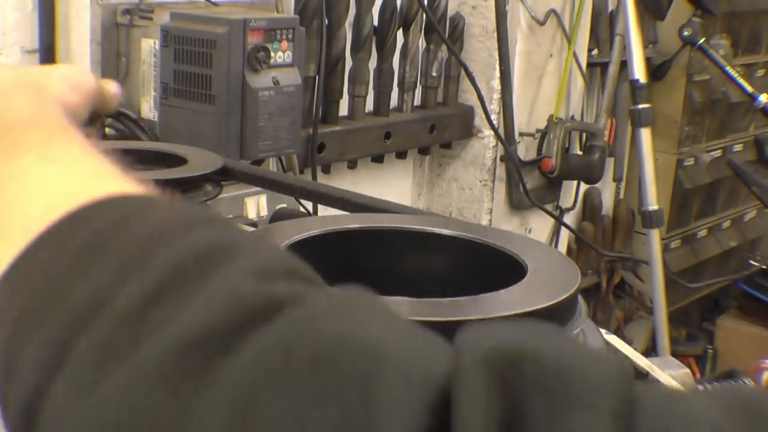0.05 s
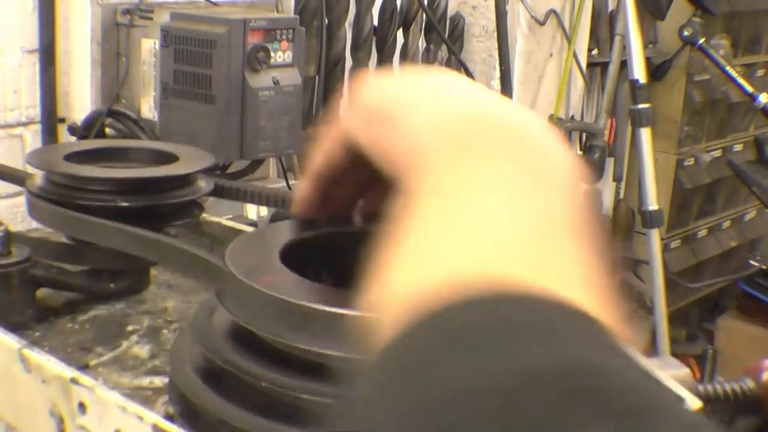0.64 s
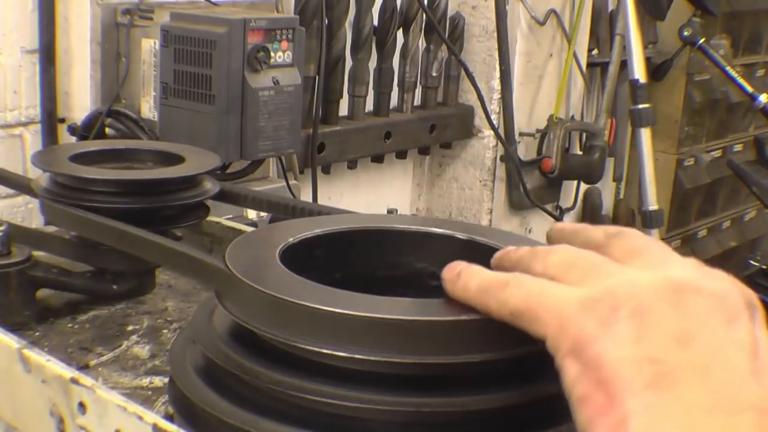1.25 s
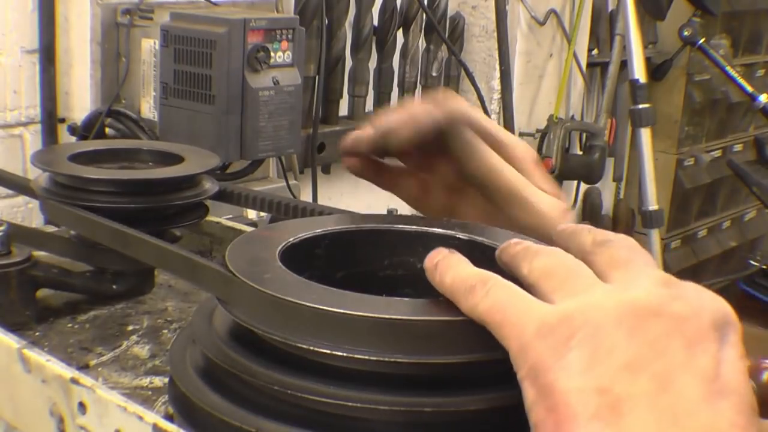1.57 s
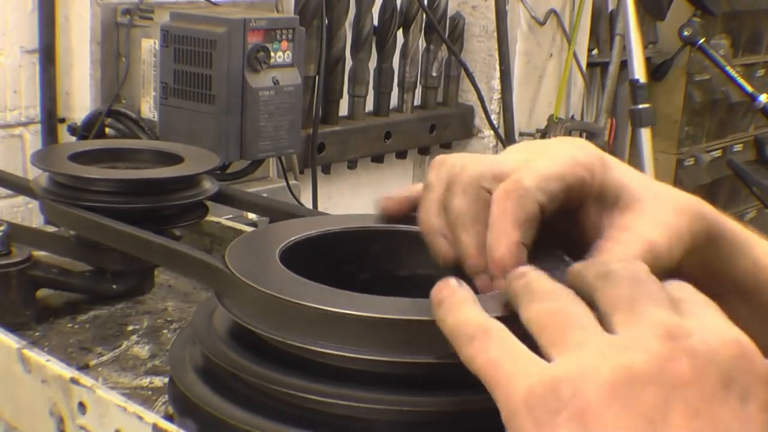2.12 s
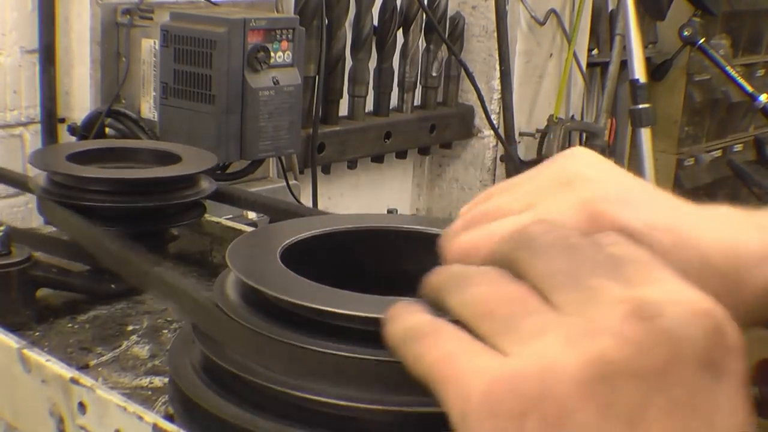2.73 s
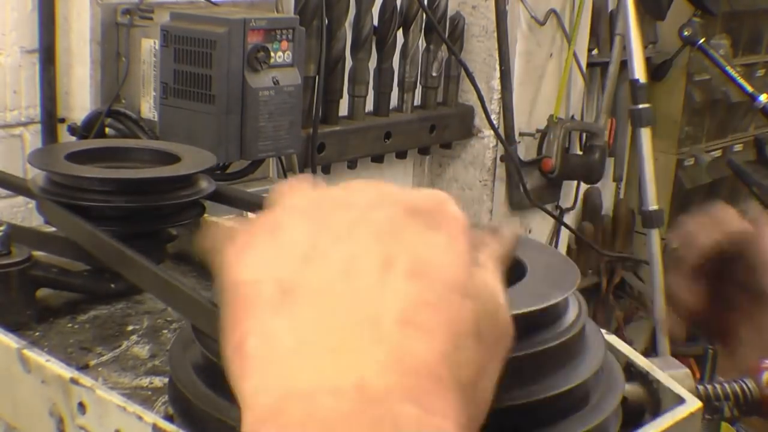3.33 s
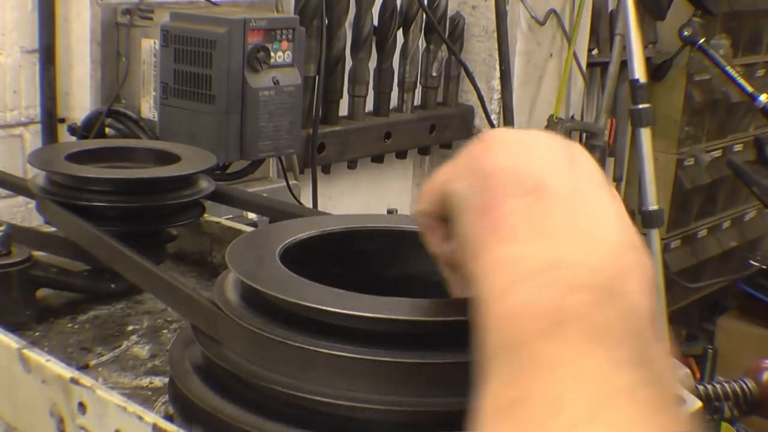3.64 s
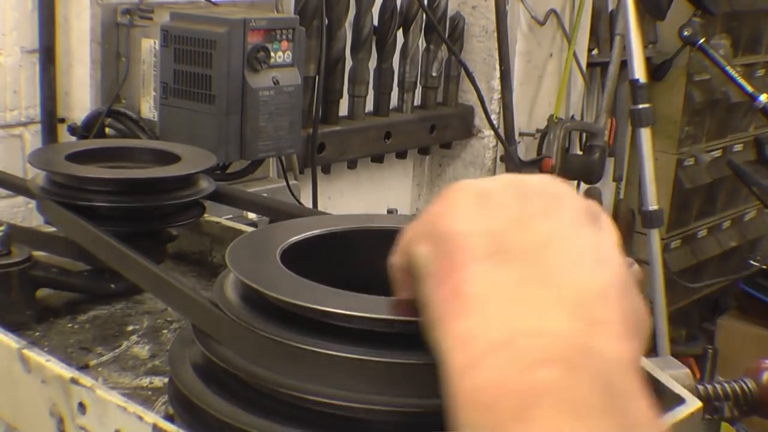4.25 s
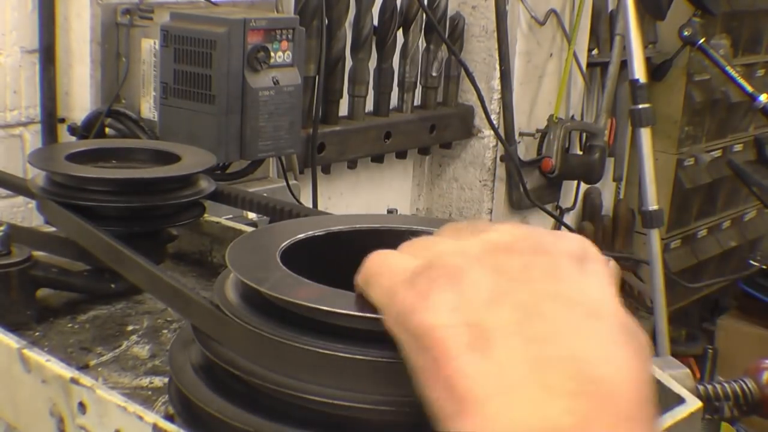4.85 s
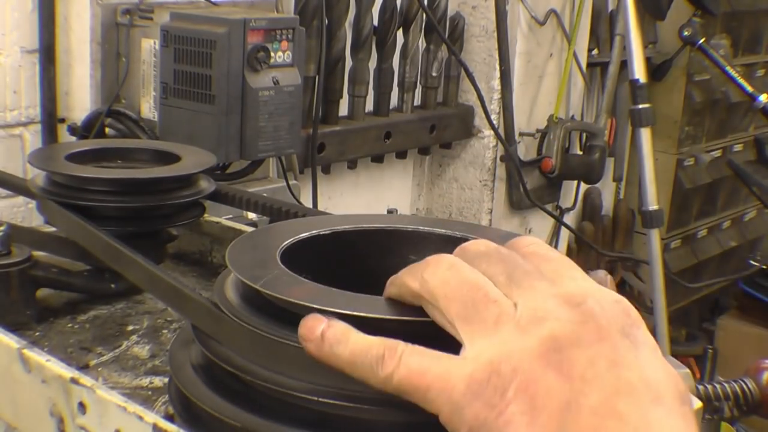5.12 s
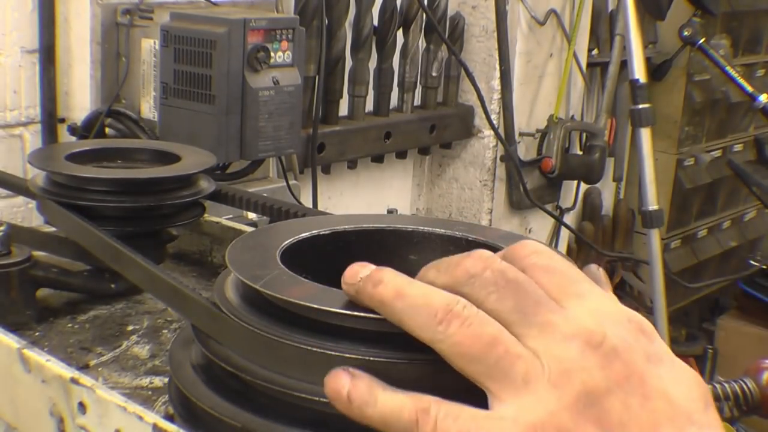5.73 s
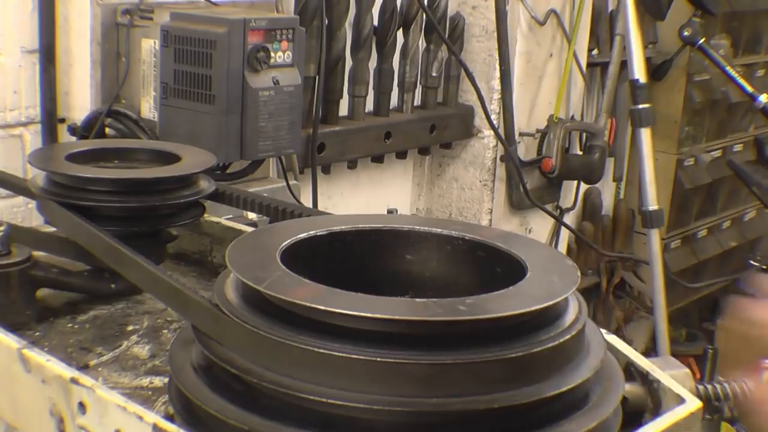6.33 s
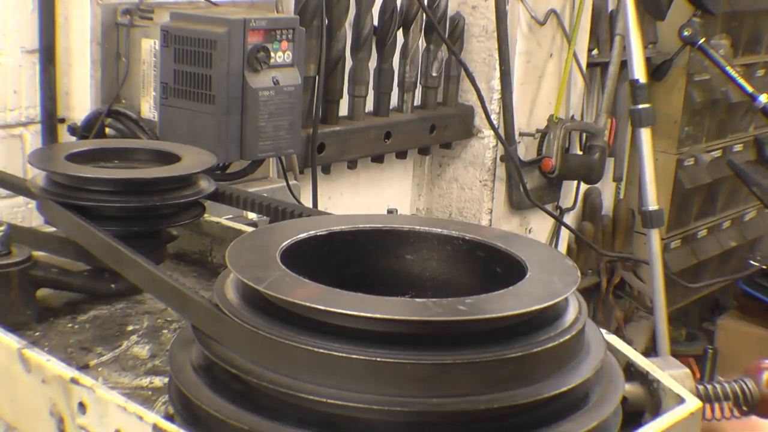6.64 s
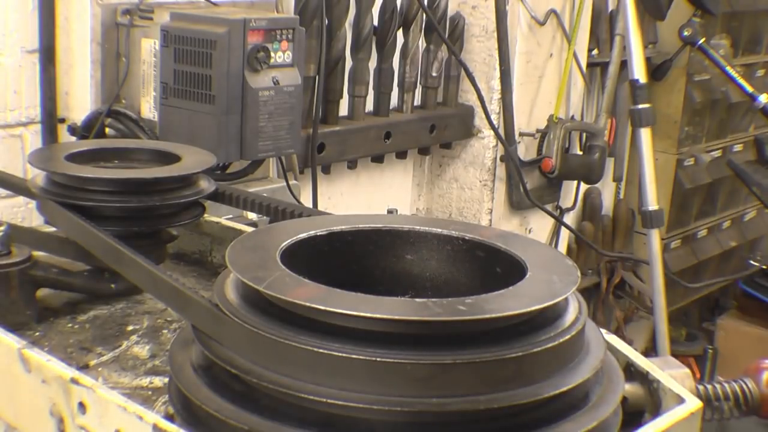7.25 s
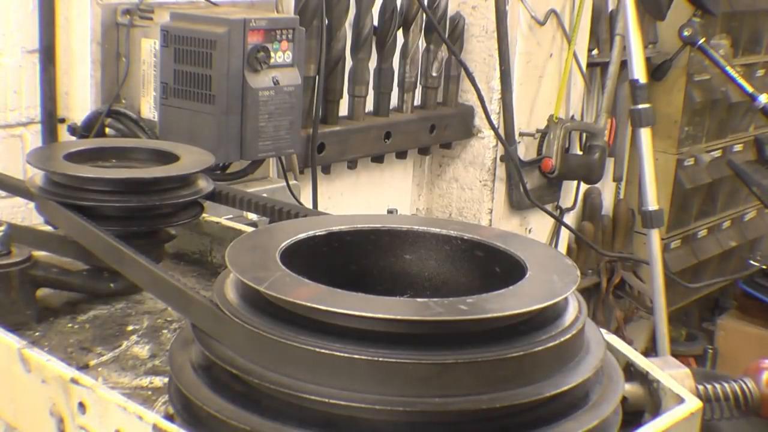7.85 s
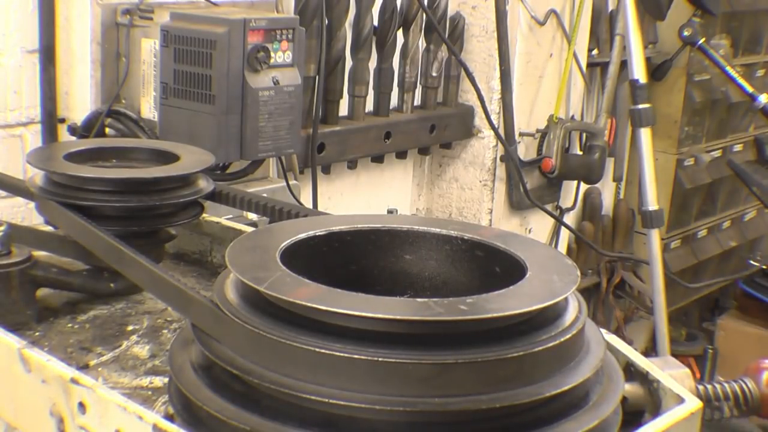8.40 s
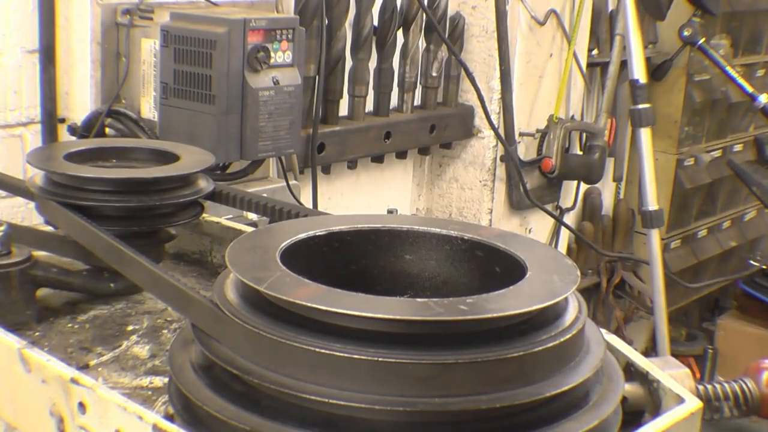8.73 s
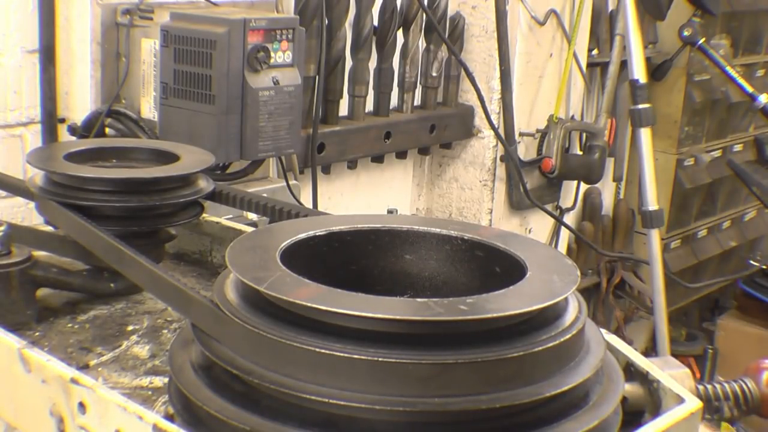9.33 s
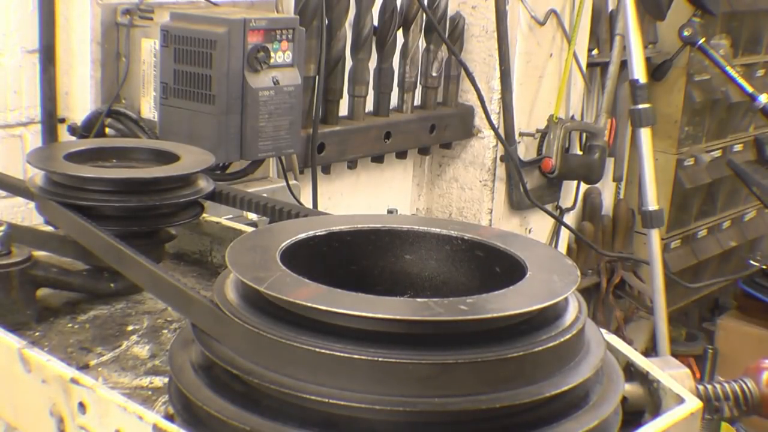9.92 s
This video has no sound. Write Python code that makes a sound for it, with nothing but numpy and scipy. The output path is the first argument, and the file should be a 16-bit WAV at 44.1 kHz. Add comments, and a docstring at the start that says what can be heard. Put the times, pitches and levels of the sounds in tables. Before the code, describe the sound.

A drive belt thumps and scrapes as it is pushed onto metal pulleys by hand, with light knocks in a quiet workshop.

```python
"""In a small workshop, a rubber V-belt is worked by hand onto the stepped pulleys of a milling machine.
The pulley is turned on rumbling bearings, the belt dragging in its groove by stick-slip friction.
The belt scrapes over a flange and thumps home, exciting the modes of the machine head.
Hands and sleeves brush the metal, loose parts click, a struck lever rings near the end,
and something whirs steadily in the room."""
import sys
import numpy as np
from scipy import signal
from scipy.fft import rfft, irfft, next_fast_len
from scipy.io import wavfile

SR = 44100
rng = np.random.default_rng(int(sys.argv[2]) if len(sys.argv) > 2 else 0)


def digitize_waveform(pressure):
    """Quantize a signal to 16-bit integers and store it at the path in sys.argv[1].

    Rows of a 2-D input are taken as channels; values are limited to [-1, 1].
    """
    field = np.atleast_2d(pressure).T
    bounded = np.clip(field, -1, 1)
    quanta = np.round(bounded * 32767).astype(np.int16)
    wavfile.write(sys.argv[1], SR, quanta)


N = 439677
TIME = np.arange(N) / SR
SHORT = TIME[:SR // 5]
HANDS_OFF_S = 7.3  # light touching and faint ticks end here


def undb(db):
    """Amplitude ratio of a level in decibels."""
    return 10 ** (np.asarray(db) / 20)


def unit(x):
    """Normalisation to rms 1."""
    return x / np.sqrt(np.mean(x ** 2))


def at_hz(hz, points):
    """Interpolation of (frequency_hz, value) points on a logarithmic frequency axis."""
    point_hz, value = np.transpose(points)
    return np.interp(np.log(hz + 1), np.log(point_hz), value)


def colour(x, points):
    """Minimum-phase filter through (frequency_hz, gain_db) points, made by folding the cepstrum."""
    size = 8192
    gain = undb(at_hz(np.fft.rfftfreq(size, 1 / SR), points))
    cepstrum = irfft(np.log(gain))
    cepstrum[1:size // 2] *= 2
    cepstrum[size // 2 + 1:] = 0
    return signal.oaconvolve(x, irfft(np.exp(rfft(cepstrum))))[:len(x)]


def band(x, lo_hz, hi_hz):
    """Maximally flat band-pass filter."""
    sections = signal.butter(2, [lo_hz, hi_hz], "band", fs=SR, output="sos")
    return signal.sosfilt(sections, x + 1e-18)


def resonate(x, hz, width_hz):
    """Second-order resonance with gain 1 at its centre."""
    return signal.lfilter(*signal.iirpeak(hz, hz / width_hz, SR), x + 1e-18)


def ring(force, modes):
    """Modal superposition: each mode's bandwidth is inversely proportional to its decay time."""
    return sum(undb(db) * resonate(force, hz, np.log(1000) / np.pi / t60) for hz, db, t60 in modes)


def add(track, start_s, sound):
    """Superposition of a sound on a track."""
    i = int(start_s * SR)
    track[i:i + len(sound)] += sound[:N - i]


def wander(rate_hz):
    """Slow random modulation: straight lines between normally distributed values."""
    steps = np.arange(0, N / SR + 1, 1 / rate_hz)
    return np.interp(TIME, steps, rng.standard_normal(len(steps)))


def friction(slips_per_s, spread_db, hiss):
    """Stick-slip friction: random impulses of unequal size over a smooth hiss."""
    slips = (rng.random(N) < slips_per_s / SR) * rng.standard_normal(N)
    slips *= undb(spread_db * rng.standard_normal(N))
    return unit(unit(slips) + hiss * rng.standard_normal(N))


def contact(decay_s):
    """Impact noise: an exponentially decaying burst with the energy of 20 ms at rms 1."""
    burst = rng.standard_normal(len(SHORT)) * np.exp(-SHORT / decay_s)
    return burst * np.sqrt(SR / 50 / np.sum(burst ** 2))


def strokes(rows, attack_s, release_s, arch_db):
    """Amplitude envelope of hand movements: each sets in, presses hardest midway and dies away."""
    gain = np.zeros(N)
    for start_s, length_s, db in rows:
        t = TIME[:int((length_s + 10 * release_s) * SR)]
        arch = undb(db - arch_db * (2 * np.minimum(t / length_s, 1) - 1) ** 2)
        release = np.exp(-np.maximum(t - length_s, 0) / release_s)
        add(gain, start_s, arch * np.minimum(t / attack_s, 1) * release)
    return gain


# Stereo width: frequency_hz, side_gain_db
SIDE_SPECTRUM = [(60, -19.5), (250, -13.5), (500, -15.5), (1000, -11), (2000, -8), (5500, -12), (8000, 4.5),
                 (13000, -1)]
def stereo(mid, side):
    """Spatial coherence: two close microphones agree in the bass and differ more in the treble."""
    side = colour(side, SIDE_SPECTRUM)
    return np.array([mid + side, mid - side])


# Spectrum of the air noise: frequency_hz, gain_db
WHIR_SPECTRUM = [(20, -17), (40, -11), (58, -3.5), (90, -6), (170, -8), (310, -4), (480, -5), (650, -3),
                 (950, -2), (1400, -12), (2800, -26), (6000, -26), (11000, -24), (15000, -25.5)]
def whir(level_db=-58):
    """Nearly stationary broadband air noise, like that of a small cooling fan."""
    mid, side = (unit(colour(rng.standard_normal(N), WHIR_SPECTRUM)) for _ in range(2))
    return stereo(mid, side) * undb(level_db + .5 * wander(4.5))


# Spectrum of skin and cloth on metal: frequency_hz, gain_db
BRUSH_SPECTRUM = [(200, -9.5), (700, 11.5), (1300, 8), (2000, 5.5), (3500, 6.5), (4500, 2), (6000, 6.5),
                  (11500, -0.5), (15000, -13)]
# Sweeps of a hand or sleeve: start_s, length_s, level_db
HAND_SWEEPS = [(.27, 0.096, -56), (.68, 0.13, -57.5), (2.22, 0.21, -53.5), (2.54, 0.27, -54),
               (2.83, .13, -47.5), (3.6, 0.19, -62), (3.985, 0.061, -45.5), (4.33, .14, -57.5),
               (4.65, 0.053, -42.5), (4.95, 0.3, -61), (5.22, 0.56, -54), (5.6, 0.12, -47.5),
               (6.1, .06, -49), (6.24, 0.14, -54.5), (6.49, 0.22, -43), (7.04, .21, -56.5),
               (7.71, 0.08, -62), (9.62, 0.29, -61)]
def brushing(gain_db=-4, uneven_db=3.1):
    """Sliding friction of hands and sleeves: sweeps and a light, wandering touch add in power."""
    grain = unit(colour(friction(slips_per_s=1300, spread_db=1.5, hiss=0.76), BRUSH_SPECTRUM))
    touch = undb(-65.5 - 3 * wander(3.9)) * (TIME < HANDS_OFF_S)
    sweeps = strokes(HAND_SWEEPS, attack_s=0.0097, release_s=0.021, arch_db=4)
    return grain * np.hypot(touch, sweeps) * undb(uneven_db * wander(30) + gain_db)


# Spectrum of the bearings: frequency_hz, gain_db
BEARING_SPECTRUM = [(25, -23.5), (50, -53), (64, 7.5), (78, -11.5), (94, 11.5), (110, -2), (150, -1.5),
                    (280, -7.5), (500, -42), (2000, -40.5)]
# Turns of the spindle: start_s, level_db, fade_db_per_s
SPINDLE_TURNS = [(.03, -49, 38), (2.05, -50.5, 13), (2.82, -45, 33), (3.88, -54.5, 32), (6.15, -51, 50)]
def spindle(attack_s=0.069):
    """Bearing rumble builds quickly at each turn and decays exponentially as the pulley coasts."""
    envelope = np.zeros(N)
    for start_s, db, fade_db_per_s in SPINDLE_TURNS:
        add(envelope, start_s, np.minimum(TIME / attack_s, 1) * undb(db - fade_db_per_s * TIME))
    return unit(colour(rng.standard_normal(N), BEARING_SPECTRUM)) * envelope


def judder(length_s, count=12, period_s=0.017, sag_octaves_per_s=3.1):
    """Relaxation oscillation: a slap, then fading, uneven slips whose pitch sags as the belt slackens."""
    gap, size_db, pitch = rng.standard_normal((count, 3)).T
    after_slap = np.arange(count) > 0
    delay_s = np.cumsum(after_slap * period_s * np.exp(0.15 * gap))
    gain = np.exp(-(delay_s / length_s) ** 2) * undb(after_slap * size_db)
    pitch_ratio = 2 ** (-sag_octaves_per_s * delay_s) * np.exp(after_slap * 0.11 * pitch)
    return zip(delay_s, gain, pitch_ratio)


# Modes of the machine head and belt guard: frequency_hz, gain_db, t60_s
HEAD_MODES = [(64, -20, 1.2), (95, 3.5, 0.94), (138.9, 4.5, 0.27), (165, 3, 0.37), (221, 5, 0.33),
              (263.3, 2, 0.18), (316, 5, 0.37), (473.3, 4, 0.25), (596, 1, 0.24), (675, -1, 0.58),
              (913, 1.5, 0.44)]
# Spectrum of the rattling guard: frequency_hz, gain_db
GUARD_SPECTRUM = [(45, -49.5), (120, -10), (320, -2.5), (500, -6.5), (900, -11), (1400, -25), (6000, -42)]
# Slaps of the belt: start_s, level_db, pitch_hz, rattle_offset_db, judder_s
BELT_SLAPS = [(0.048, -34.5, 566, -9.5, 0.077), (0.333, -45, 159, -17, 0.038), (1.7, -38.5, 403, -13, .005),
              (1.793, -37.5, 398, -12, .035), (2.076, -37.5, 99.4, -3.5, 0.018),
              (2.291, -31.5, 570, -11, 0.023), (2.631, -34, 370, -5, .01), (2.84, -36.5, 101, -2, 0.079),
              (2.92, -37, 372, -0.5, 0.11), (4.006, -38.5, 254, 0.5, 0.063),
              (4.179, -36.5, 220, -19, 0.041), (4.422, -37.5, 233, -7, 0.034),
              (4.606, -33.5, 194, -3, 0.0083), (4.654, -23.5, 234, -5.5, .035),
              (5.253, -36, 380, 2.5, 0.011), (5.489, -32, 203, -7.5, 0.031),
              (5.566, -14, 239, -11.5, 0.053), (5.67, -33, 187, -27.5, 0.091),
              (6.107, -27, 309, -1.5, 0.025), (6.125, -17.5, 214, -8.5, 0.044),
              (6.195, -20, 174, -21, .005), (6.249, -17, 165, -18, 0.038), (6.528, -43, 176, 3.5, 0.19),
              (7.792, -51, 95, 8, 0.022), (8.233, -45.5, 280, -16, 0.042), (9.65, -41, 183, -5.5, 0.074)]
def belt_thumps(swell_cycles=1.355, rattle_attack_s=0.0034, rattle_decay_s=0.014):
    """Forced vibration: each slip swings the belt a few cycles, rattles the guard and rings the head."""
    swing, shake = np.zeros((2, N))
    jolt = np.minimum(SHORT / rattle_attack_s, 1) * np.exp(-SHORT / rattle_decay_s)
    for start_s, db, pitch_hz, rattle_db, judder_s in BELT_SLAPS:
        for delay_s, gain, pitch_ratio in judder(judder_s):
            hz = pitch_hz * pitch_ratio
            phase = 2 * np.pi * hz * SHORT
            age = SHORT * hz / swell_cycles
            swell = (age * np.exp(1 - age)) ** 2
            # rubber damps the octave of a fast swing more than that of a slow one
            octave = undb(-12) * min(1, 180 / hz) ** 3 * np.sin(2 * phase)
            add(swing, start_s + delay_s, gain * undb(db) * swell * (octave - np.sin(phase)))
            add(shake, start_s + delay_s, gain * undb(db + rattle_db) * jolt)
            if gain < .02:
                break
    rattle = undb(-4) * shake * unit(colour(rng.standard_normal(N), GUARD_SPECTRUM))
    return undb(-2) * swing + ring(swing + rattle, HEAD_MODES), rattle


# Knocks of metal parts and fingernails: start_s, level_db, body_offset_db, edge_offset_db, clack_hz
HARD_CONTACTS = [(0.077, -49.5, 1, -19, 3380), (0.2734, -36.5, -3.5, -17, 2600),
                 (0.3161, -43, -2, -22, 2600), (1.273, -41.5, 0, 5, 3500), (2.0519, -28.5, -8, -22, 3520),
                 (2.4784, -49, -22, 6.5, 3200), (2.586, -37, -2, 6, 3600), (2.608, -41.5, -3.5, -8, 3000),
                 (2.6337, -37.5, -3.5, -6, 3370), (2.7922, -32.5, 0.5, -2.5, 3000),
                 (2.798, -28, -2, -14, 2040), (2.9337, -54, 2, 12.5, 3500), (4.665, -43, 2.5, 0.5, 3200),
                 (4.9313, -39, -0.5, 2.5, 3000), (5.2151, -41, -1.5, 3, 3000),
                 (5.4967, -41.5, -1, 3.5, 3220), (6.128, -43, 3.5, -4, 2600), (6.4862, -50.5, 5, 0, 2800),
                 (6.5106, -41, 4.5, 3.5, 2800), (7.1116, -35.5, -10, -6.5, 2100),
                 (7.226, -37, -13.5, -18, 2000), (7.7652, -48, 2, -13, 2200), (8.3014, -55, 6.5, 4.5, 2600)]
def knocks(body_s=0.017, crackle_s=0.0021, band_ratio=1.72):
    """Brief impacts have broad spectra, heard in three bands: hollow body, clack and bright edge."""
    body, clack, edge = np.zeros((3, N))
    snap = undb(14) * (SHORT == 0)
    for start_s, db, body_db, edge_db, hz in HARD_CONTACTS:
        add(body, start_s, undb(db + body_db + 13) * contact(body_s))
        blow = snap + contact(crackle_s)
        add(clack, start_s, undb(db - 3) * band(blow, hz / band_ratio, hz * band_ratio))
        add(edge, start_s, undb(db + edge_db - 1) * (2 * snap + contact(crackle_s)))
    return band(body, 317, 1040) + clack + band(edge, 4820, 8680)


def small_ticks(ticks_per_s=4, spread_db=3):
    """Shot noise: nails and grit tick faintly at random times while the hands are at work."""
    ticks = np.zeros(N)
    count = int(ticks_per_s * HANDS_OFF_S)
    for start_s, size in zip(rng.uniform(0, HANDS_OFF_S, count), rng.standard_normal(count)):
        add(ticks, start_s, undb(-63.5 - spread_db * size) * contact(decay_s=0.0027))
    return band(ticks, 2500, 8300)


# Resonances of the pulley: frequency_hz, bandwidth_hz, gain_db
PULLEY_RESONANCES = [(404, 92, 0), (700, 56, -3), (1230, 60, -13), (1930, 90, -18)]
# Pushes that turn the pulley: start_s, length_s, level_db
PULLEY_PUSHES = [(1.7, 0.25, -54), (2.06, 0.5, -46), (2.79, 0.21, -49.5), (3.75, 0.91, -57), (4.9, 1, -53)]
def belt_drag():
    """Stick-slip excitation: rubber dragging in the groove drives the pulley's resonances."""
    slips = friction(slips_per_s=400, spread_db=3, hiss=0.74)
    pulley = sum(undb(db) * resonate(slips, hz, width) for hz, width, db in PULLEY_RESONANCES)
    pressure = strokes(PULLEY_PUSHES, attack_s=0.029, release_s=0.14, arch_db=3.5)
    return unit(band(pulley, 243, 1800)) * pressure


# Resonances of the flange: frequency_hz, bandwidth_hz, gain_db
FLANGE_RESONANCES = [(2040, 180, 13), (2920, 120, 10), (5200, 2900, 4), (10450, 780, 1)]
# Passes of the belt's edge over the flange: start_s, length_s, level_db
FLANGE_SCRAPES = [(1.7, .22, -68), (2.86, 0.069, -46), (5.555, 0.21, -47), (7.09, .17, -62)]
def belt_scrape(gain_db=-3):
    """Frictional excitation: dense slips of the taut belt make the flange sing thinly."""
    slips = friction(slips_per_s=2200, spread_db=4, hiss=0.54)
    flange = sum(undb(db) * resonate(slips, hz, width) for hz, width, db in FLANGE_RESONANCES)
    pressure = strokes(FLANGE_SCRAPES, attack_s=0.011, release_s=0.013, arch_db=1)
    return unit(flange) * pressure * undb(gain_db)


# Modes of the lever: frequency_hz, gain_db, t60_s
LEVER_MODES = [(985, 10, 0.42), (1044, 9, 0.35), (1920, -5, 0.14), (2800, -1, 0.14), (3500, 1.5, 0.3),
               (4280, -1, 0.19), (5560, -1, 0.24), (6060, -13, .18)]
# Strikes of the lever on its stop: start_s, level_db, ring_offset_db, tick_hz
LEVER_STRIKES = [(8.657, -41, -12, 2430), (8.756, -43, -6, 1600), (9.104, -38.5, -2, 3670),
                 (9.118, -37.5, 7, 6100)]
def lever(tick_q=5):
    """Free vibration: a steel lever ticks on its stop and rings; brighter contacts hiss more."""
    ticks, force = np.zeros((2, N))
    brightest_hz = max(row[-1] for row in LEVER_STRIKES)
    for start_s, db, ring_db, hz in LEVER_STRIKES:
        blow = undb(db) * contact(decay_s=0.012)
        hiss = undb(-11) * hz / brightest_hz * blow
        add(ticks, start_s, undb(7) * resonate(blow, hz, hz / tick_q) + hiss)
        add(force, start_s, undb(db + ring_db + 41) * (SHORT == 0))
    return band(ticks, 570, 15000), ring(force, LEVER_MODES)


def early_reflections(x, decay_s=0.025, gap_s=0.0028):
    """Convolution with short echo paths off the guard, the machine and the wall behind it."""
    t = TIME[:SR // 10]
    paths = rng.standard_normal((2, len(t))) * np.exp(-t / decay_s) * (t > gap_s)
    return stereo(*(signal.oaconvolve(x, h / np.sqrt(np.sum(h ** 2)))[:N] for h in paths))


# Reverberation time of the workshop: frequency_hz, t60_s
WORKSHOP_DECAY = [(150, 0.52), (500, 0.2), (2000, 0.37), (6000, 0.37), (14000, 0.067)]
def reverberation(x, frame_samples):
    """Diffuse field: each band stores energy and releases it exponentially, with random phase."""
    hop = frame_samples // 2
    hz, _, spectra = signal.stft(x, SR, nperseg=frame_samples)
    retention = np.exp(-2 * np.log(1000) * hop / SR / at_hz(hz, WORKSHOP_DECAY))
    received = np.abs(spectra) ** 2 + 1e-24
    stored = [signal.lfilter([0, 1 - k], [1, -k], row) for k, row in zip(retention, received)]
    fields = []
    for _ in range(2):
        scatter = rng.standard_normal(spectra.shape) + 1j * rng.standard_normal(spectra.shape)
        fields.append(signal.istft(np.sqrt(stored) * scatter, SR, nperseg=frame_samples)[1][:N])
    return stereo(*fields)


# Phase of the left microphone relative to the right: frequency_hz, lead_rad
LEFT_LEAD = [(20, .7), (60, 0.6), (170, 0.3), (300, .3), (500, 0.31), (800, 0.7), (1300, 0.5),
             (2200, -0.37), (4000, -0.2)]
def arrival_phase(pair):
    """Interchannel phase: sound reaches the two microphones slightly out of step."""
    size = next_fast_len(N)
    lead = at_hz(np.fft.rfftfreq(size, 1 / SR), LEFT_LEAD)
    return irfft(rfft(pair, size) * np.exp(.5j * np.array([lead, -lead])), size)[:, :N]


def scene():
    """Superposition of direct sound from within arm's reach, early reflections and reverberation."""
    thumps, rattle = belt_thumps()
    lever_ticks, clink = lever()
    hits = knocks() + lever_ticks + small_ticks()
    drag = belt_drag()
    rubs = belt_scrape() + brushing() + rattle
    early = undb(-5) * early_reflections(hits + rubs + undb(-7) * thumps)
    # short frames answer the knocks at once; long frames answer later
    bright = undb(-7) * reverberation(hits, frame_samples=256)
    late = reverberation(undb(-16) * thumps + undb(-5) * (rubs + drag), frame_samples=1024)
    low = undb([[-.5], [.6]]) * (thumps + spindle())  # left and right gains
    high = undb([[-1.6], [-3]]) * (hits + clink + rubs + drag)
    return arrival_phase(low + high + early + bright + late + whir())


# Response of the microphone: frequency_hz, gain_db
MIC_RESPONSE = [(25, -25), (60, 3.5), (4600, -1), (5400, 4), (6700, 2), (7300, -5), (7800, -13), (8500, -6),
                (12000, -6.5), (15000, -13.5)]
def record(dry, cutoff_hz=15450):
    """Transducer response: a presence peak, a notch above it and a steep treble cut."""
    low_pass = signal.ellip(10, .2, 80, cutoff_hz, fs=SR, output="sos")
    return signal.sosfilt(low_pass, [colour(x, MIC_RESPONSE) for x in dry])


dry = scene()
out = record(dry)
digitize_waveform(out)
```